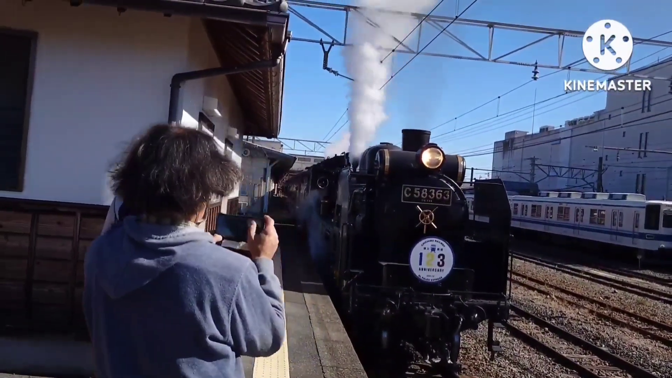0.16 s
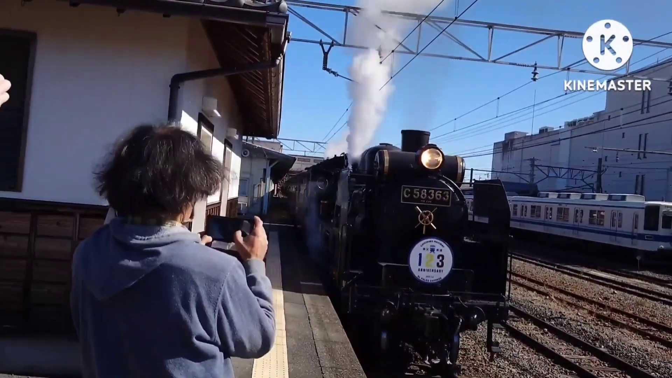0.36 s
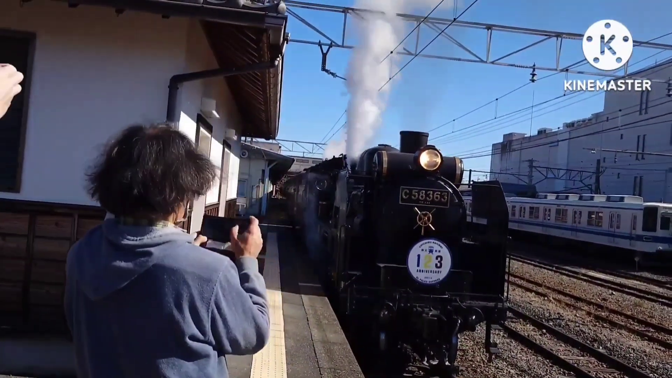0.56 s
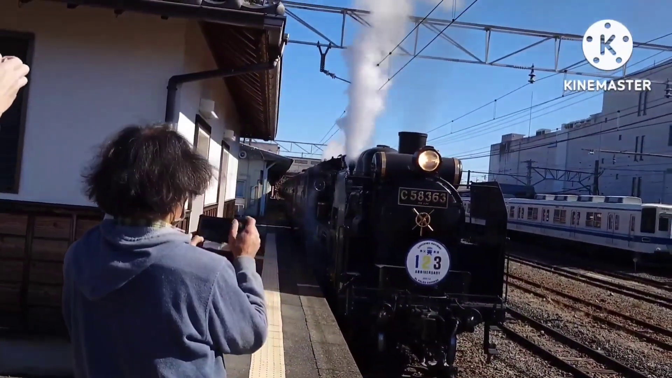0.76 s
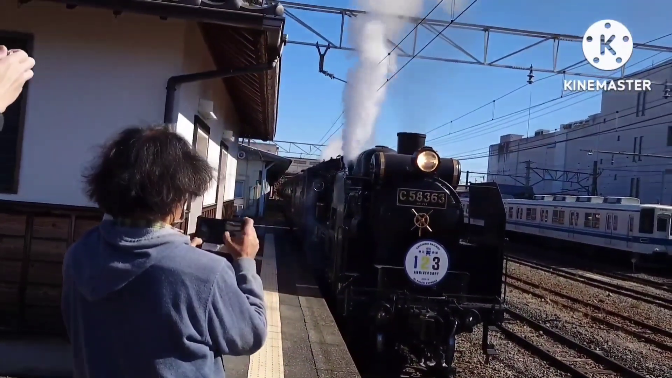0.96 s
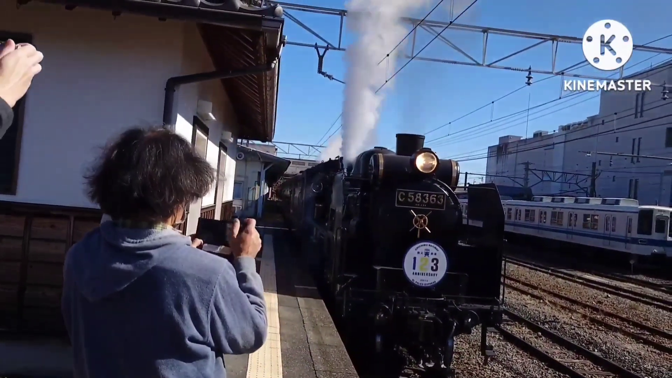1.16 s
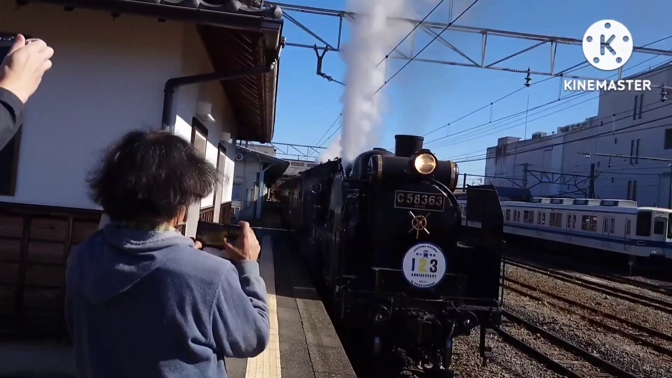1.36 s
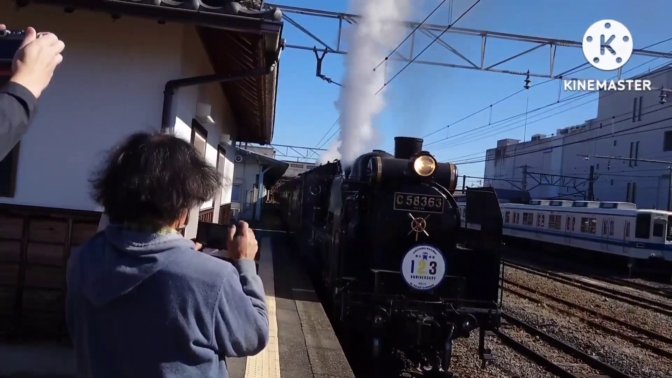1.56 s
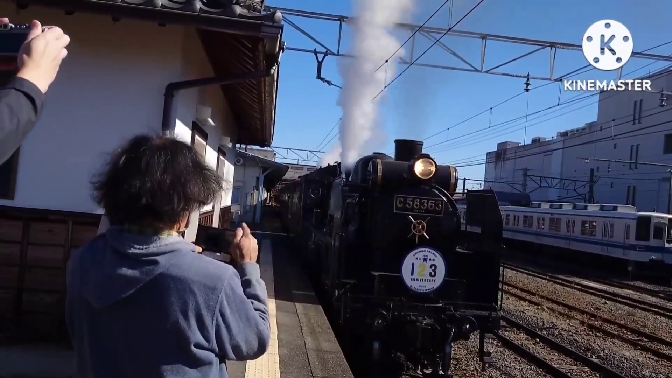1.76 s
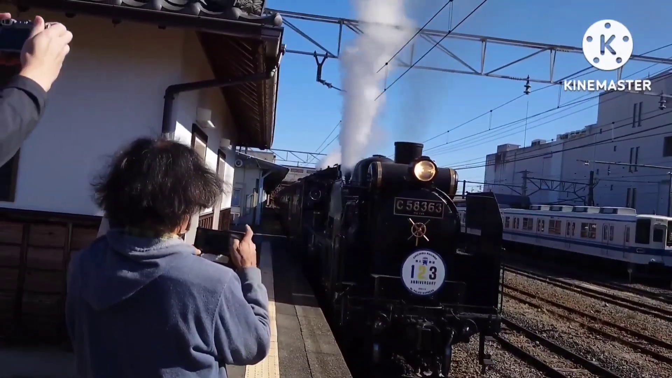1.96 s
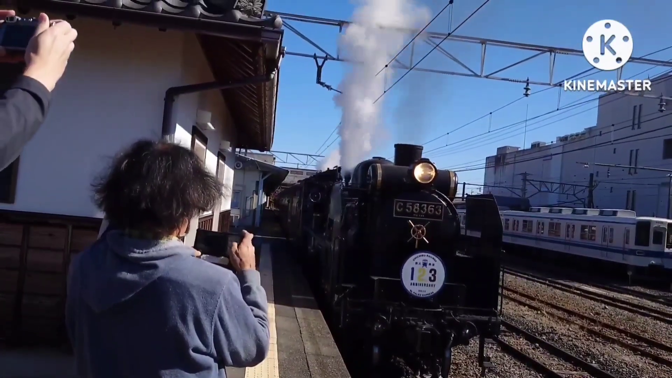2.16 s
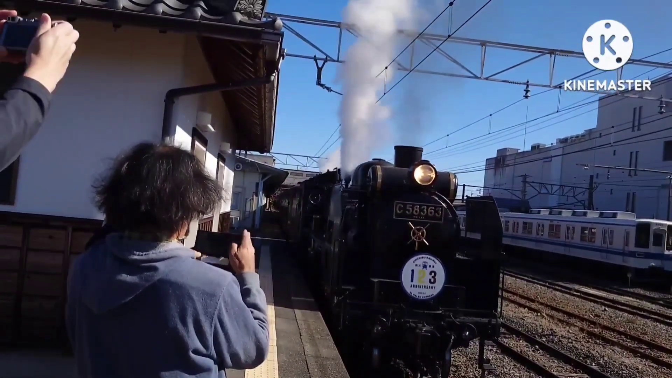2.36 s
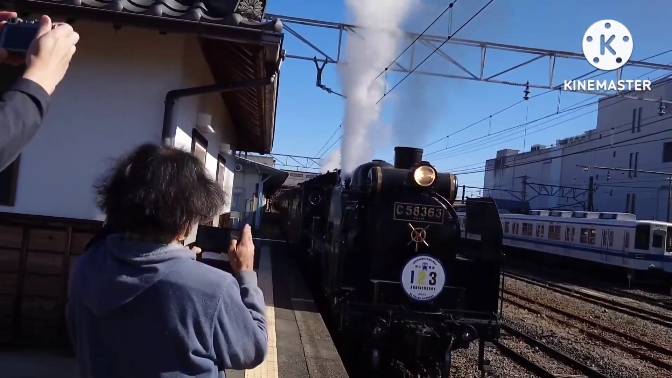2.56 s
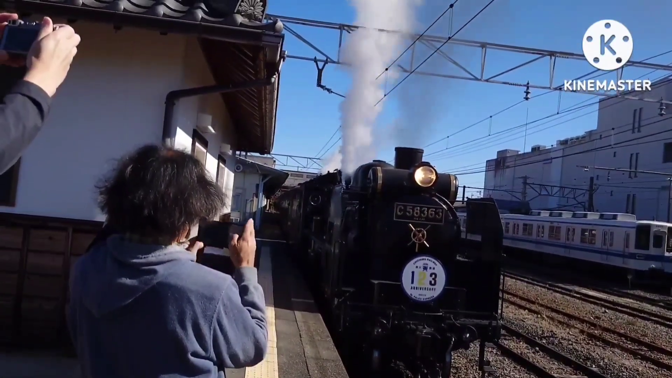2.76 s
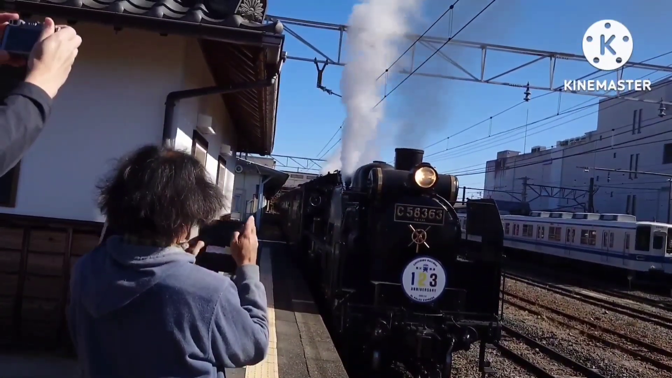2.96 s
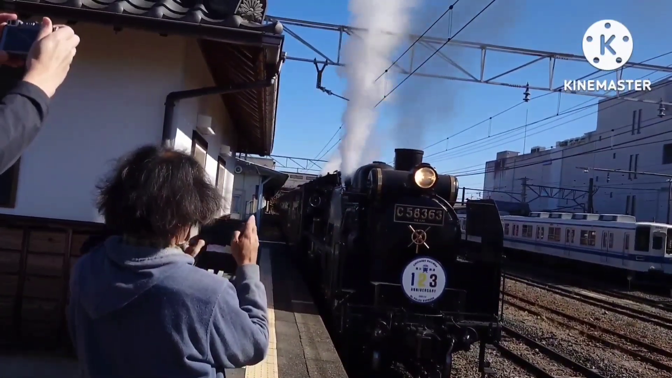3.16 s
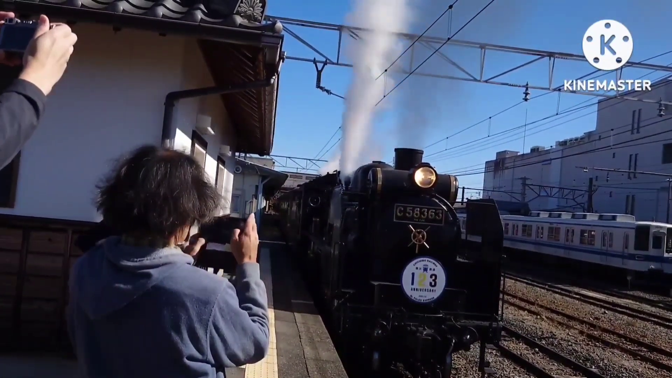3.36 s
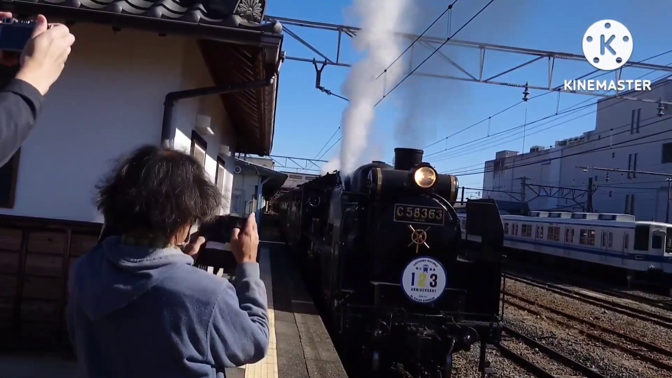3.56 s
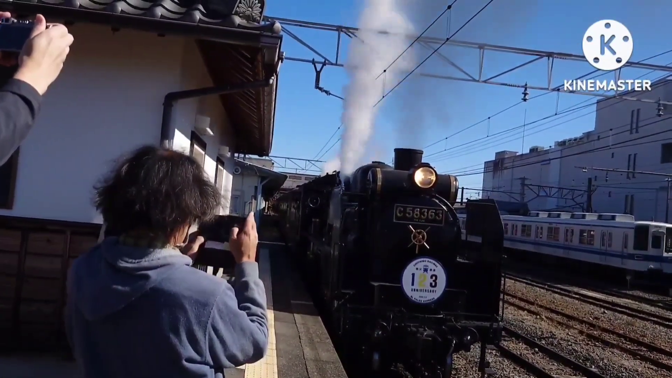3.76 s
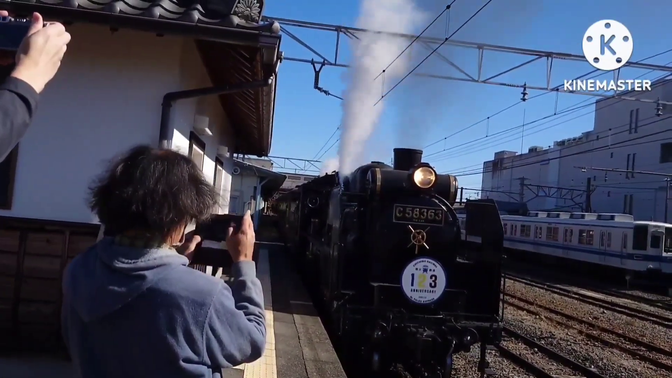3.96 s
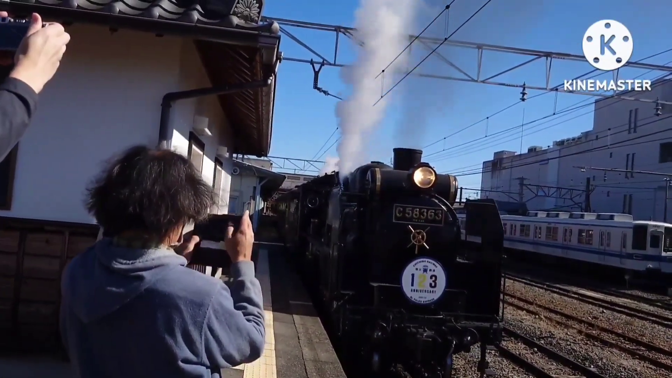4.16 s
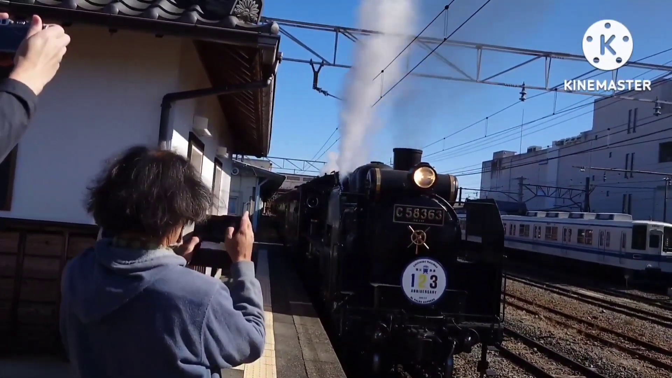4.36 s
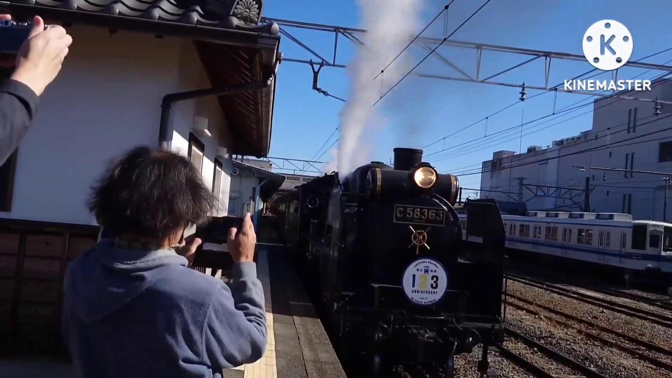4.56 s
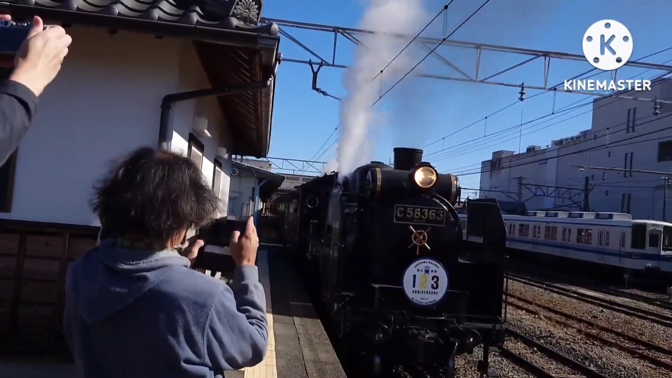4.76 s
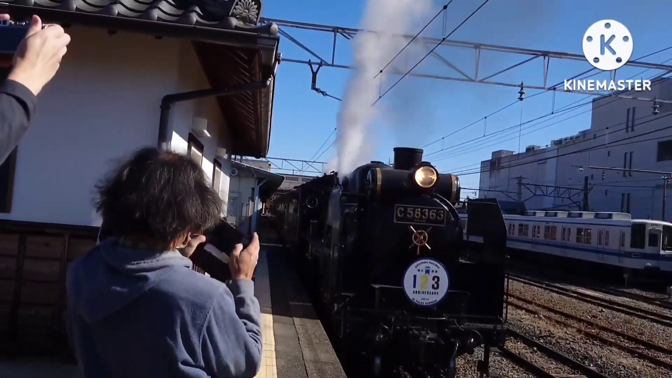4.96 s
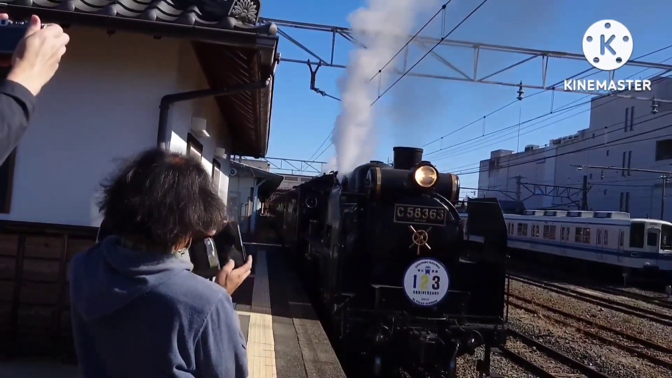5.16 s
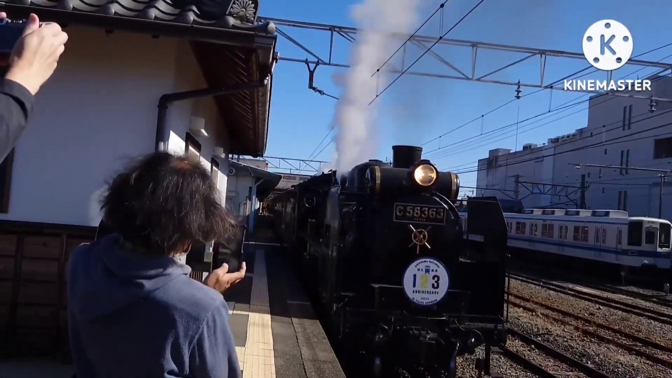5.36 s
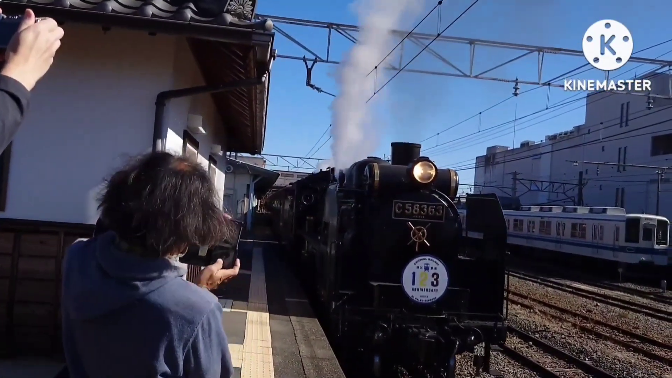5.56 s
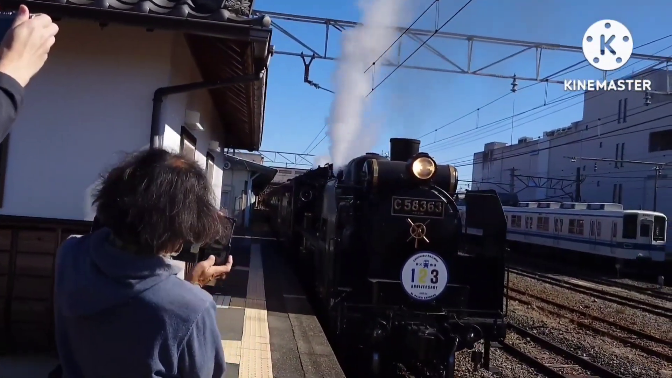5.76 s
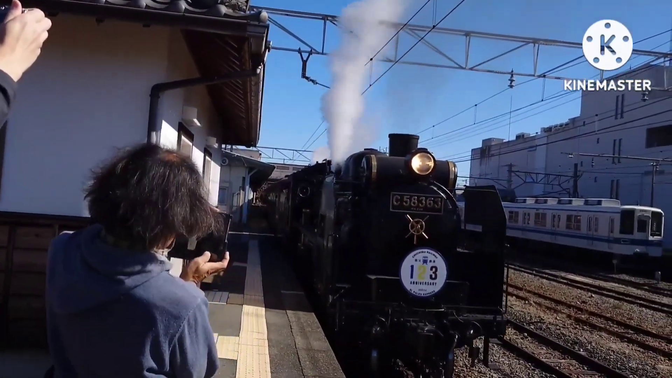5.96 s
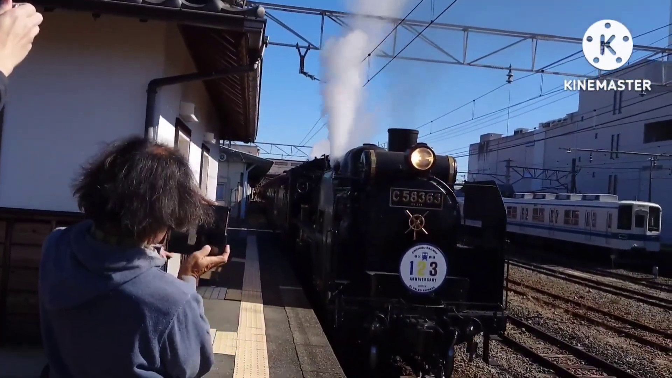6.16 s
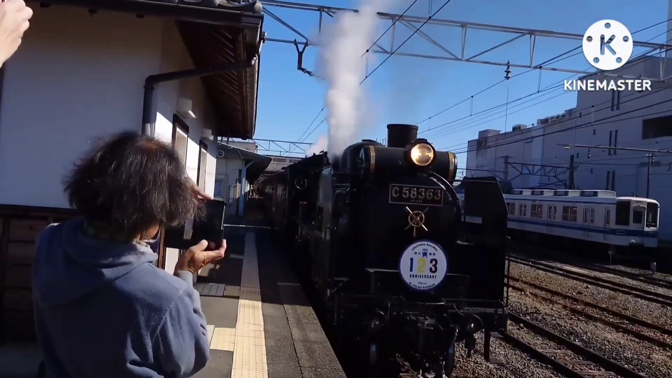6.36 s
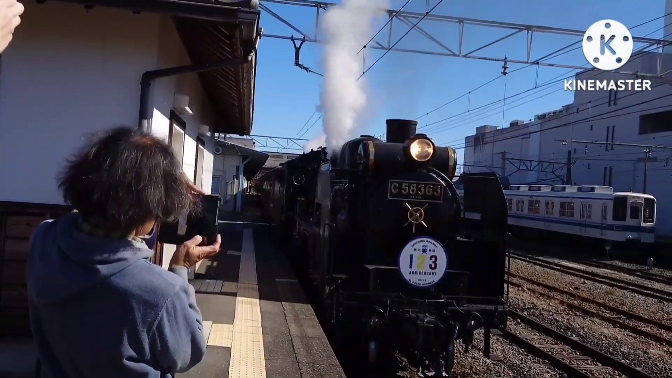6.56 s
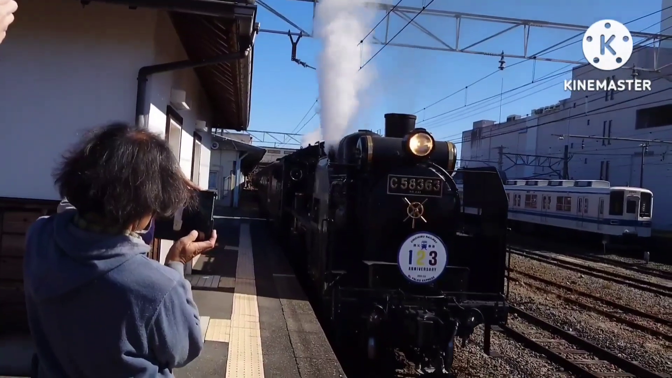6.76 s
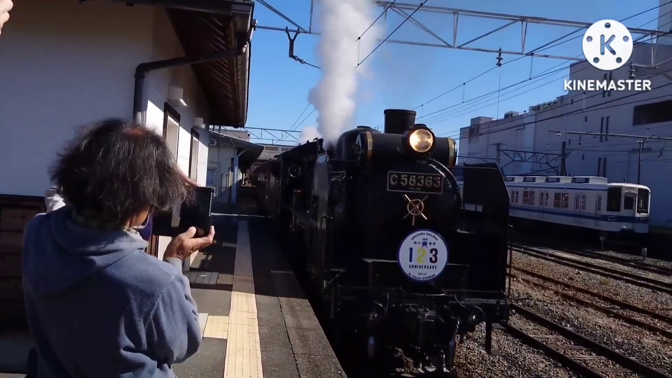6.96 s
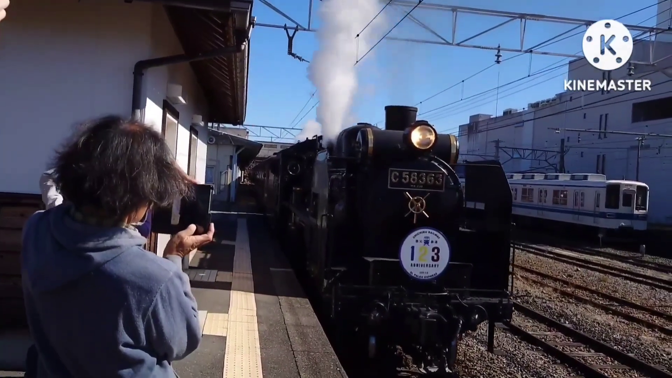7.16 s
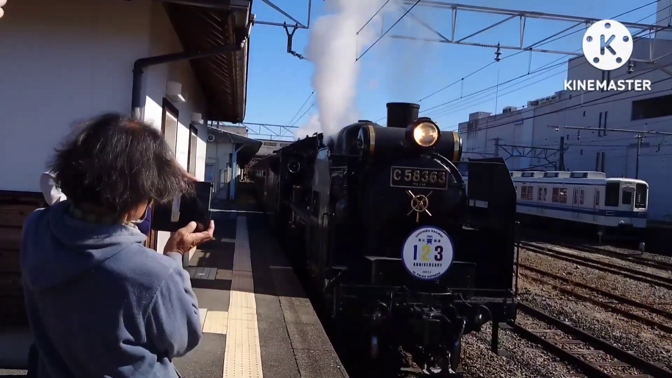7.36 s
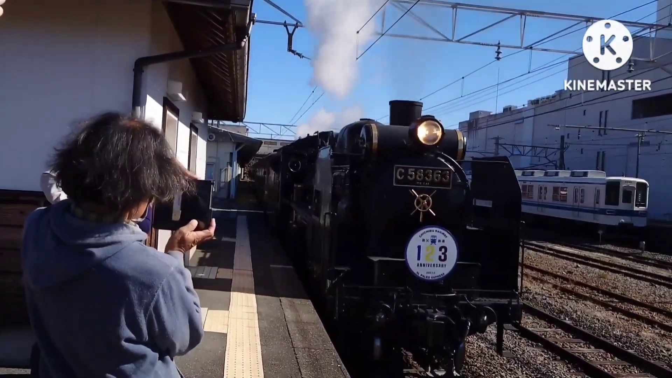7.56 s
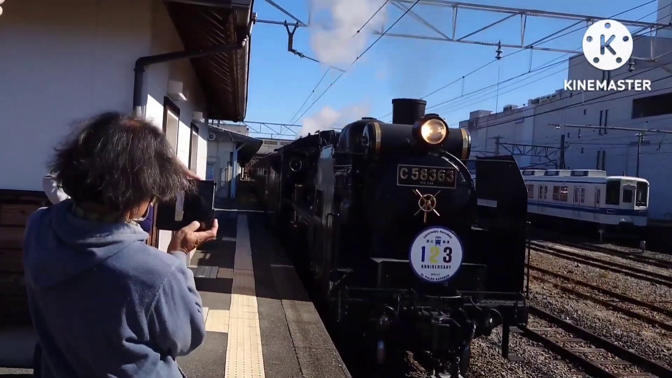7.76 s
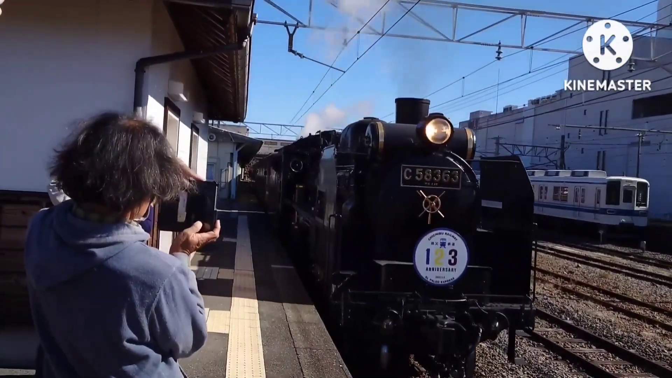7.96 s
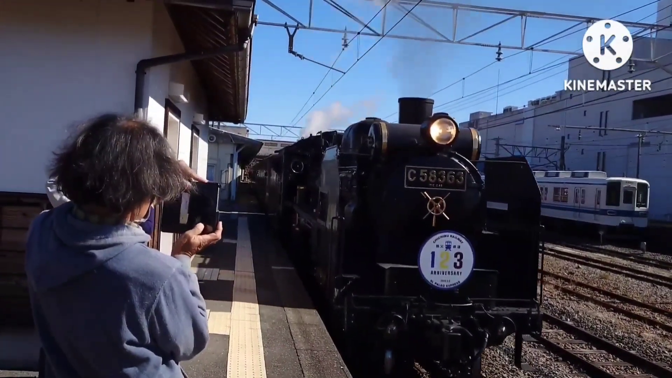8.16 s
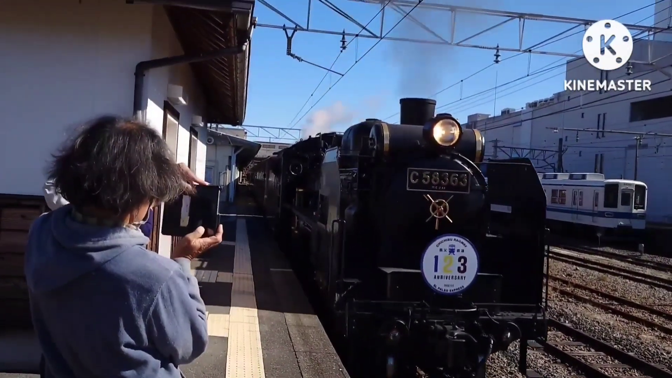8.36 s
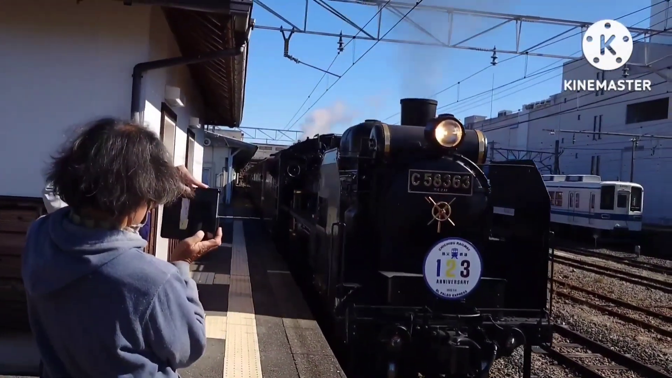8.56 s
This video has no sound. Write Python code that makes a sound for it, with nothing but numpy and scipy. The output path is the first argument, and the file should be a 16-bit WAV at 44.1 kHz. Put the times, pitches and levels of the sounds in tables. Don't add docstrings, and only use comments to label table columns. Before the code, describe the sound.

One sustained steam whistle blast fills nearly the whole sound, middle-pitched, dense and beating, with rough rushing steam around it. A brief water sputter breaks it midway, and the pitch dips slightly before the valve closes. The chord then lingers and fades off distant walls over soft leaking steam, with gusts bumping the handheld microphone. Near, loud, outdoors, with short platform reflections.

```python
import sys
import numpy as np
from scipy import signal
from scipy.fft import rfft, irfft, next_fast_len
from scipy.io import wavfile
from scipy.ndimage import uniform_filter1d

SR = 44100
rng = np.random.default_rng(int(sys.argv[2]) if len(sys.argv) > 2 else 0)


def to_wav(s):
    ch = np.atleast_2d(s).T
    pcm = np.round(np.clip(ch, -1, 1) * 32767)
    wavfile.write(sys.argv[1], SR, pcm.astype(np.int16))


def gain_from_db(level_db):
    decades = np.asarray(level_db, float) / 20
    return 10 ** decades


N = 379701

SHUT_S = 7.66
EASE_S, EASE_LENGTH_S = 6.45, 0.249
LEFT_RIGHT = np.array([[1], [-1]])


def clock():
    return np.arange(N) / SR


def ramp(start_s, length_s):
    return np.clip((clock() - start_s) / length_s, 0, 1)


def bump(s, half_s):
    return np.exp(-((clock() - s) / half_s) ** 2)


def rms_one(x):
    return x / np.sqrt(np.mean(np.abs(x) ** 2) + 1e-20)


def in_time(rows):
    s, *columns = np.transpose(rows)
    return [np.interp(clock(), s, column) for column in columns]


def at_hz(points, hz):
    point_hz, level_db = np.transpose(points)
    return np.interp(np.log(hz), np.log(np.maximum(point_hz, 1)), level_db)


def drift(rate_hz):
    r = np.exp(-80 * np.pi * rate_hz / SR)
    noise = rng.standard_normal(N // 40 + 2002)
    slow = signal.lfilter([1], [1, -2 * r, r * r], noise)[2000:]
    return np.interp(np.arange(N) / 40, np.arange(len(slow)), rms_one(slow))


def two_ports(tone, pan_db, lead):
    left = gain_from_db(pan_db / 2) * np.real(tone * np.exp(1j * lead))
    right = gain_from_db(-pan_db / 2) * np.real(tone)
    return np.array([left, right])


def pitch(warm_hz, flat_hz, warm_up_s, sag_hz):
    climb = flat_hz * np.exp(-clock() / warm_up_s)
    return warm_hz - climb - sag_hz * ramp(EASE_S, EASE_LENGTH_S)


def chamber(hz, level_db, wobble_hz, rough, order=1):
    turn = 2 * np.pi * np.cumsum(hz + wobble_hz) / SR
    shake = 1 + rough * (drift(13.4) + 1j * drift(18.4))
    steady_power = np.sqrt(2 / (1 + 2 * rough ** 2))
    return steady_power * gain_from_db(level_db) * shake * np.exp(1j * order * turn)


# (time [s], depth [dB], half length [s])
SPUTTERS = [
    (4.27, 12, .011),
    (4.312, 5, .01),
    (4.392, 28, .014),
    (4.464, 18, .011),
    (4.513, 8, .01),
    (4.557, 6, .01),
    (7.25, 3, .05),
]


def choke_db(stretch=1):
    return sum(db * bump(s, stretch * half_s) for s, db, half_s in SPUTTERS)


# (time [s], tone level [dB], left-right [dB])
FIRST_LEVEL = [(0, -29.5, 2), (.4, -38, -9), (.9, -42.5, -19), (1.15, -37, -13.5), (2.6, -40, -17),
               (3.8, -31.5, 0.5), (4.3, -30.5, 2), (4.39, -28, 4), (4.72, -30.5, 4), (4.95, -26.5, 2),
               (5.8, -25, 1), (6.5, -24.5, -3.5), (6.7, -27, -4), (7.66, -28, 0)]


def first_chamber(hz):
    level_db, pan_db = in_time(FIRST_LEVEL)
    wobble = 0.88 * drift(9.4)
    out = two_ports(chamber(hz, level_db, wobble, rough=0.086), pan_db, lead=0.26)
    out += two_ports(chamber(hz, -44, wobble, rough=0.25, order=3), 1.2, lead=0.4)
    return out


# (time [s], tone level [dB], left-right [dB])
SECOND_LEVEL = [(0, -23, 1), (1.0, -25.5, -2), (1.93, -26.5, -6), (2.0, -35.5, 8), (3.05, -38, 18.5),
                (4.0, -37.5, 20), (5.2, -27, -1), (6.3, -25, 7), (6.7, -30.5, -6), (7.0, -24, -5),
                (7.66, -23.5, -2)]
# (harmonic number, time [s], level before and when eased [dB], level after [dB])
OVERTONES = [
    (2, 0.5, -44, -35.5),
    (3, .7, -38.5, -37),
    (4, .02, -39.5, -35.5),
]


def second_chamber(hz):
    level_db, pan_db = in_time(SECOND_LEVEL)
    open_wide = 1 - ramp(EASE_S, EASE_LENGTH_S)
    second_db, third_db, fourth_db = (easy + (hard - easy) * ramp(s, 0.04) * open_wide
                                      for _, s, easy, hard in OVERTONES)
    wobble = 1.025 * drift(10.1)
    out = two_ports(chamber(hz, level_db, wobble, rough=0.19), pan_db, lead=0.44)
    out += two_ports(chamber(hz, second_db, wobble, rough=0.19, order=2), 3.3, lead=0.98)
    out += two_ports(chamber(hz, third_db, wobble, rough=0.22, order=3), 11.8, lead=0.47)
    out += two_ports(chamber(hz, fourth_db, wobble, rough=0.52, order=4), -8.0, lead=0.18)
    out += two_ports(chamber(hz, fourth_db - 11.0, wobble, rough=0.13, order=5), -1.5, lead=0.4)
    out += two_ports(chamber(hz, -45, wobble, rough=0.35, order=2.66), 0.3, lead=0.3)
    return out


def third_chamber(hz):
    speaking_db = -7 * (1 - ramp(0, 0.3))
    surge_db = 2.3 * bump(4.42, 0.18)
    return chamber(hz, -14 + speaking_db + surge_db - choke_db(), 2.0 * drift(9.0), rough=0.026)


# (time [s], tone level [dB])
FOURTH_LEVEL = [(0, -18.5), (.5, -26), (.75, -20.5), (1.5, -23.5), (2.0, -27.5), (2.4, -21.5), (3.3, -24),
                (3.8, -26.5), (4.4, -25.5), (5.4, -22), (6.45, -25.5), (6.7, -19), (7.0, -27.5),
                (7.25, -21), (7.66, -34)]


def fourth_chamber(hz1, hz2, hz3, hz4, loud):
    level_db, = in_time(FOURTH_LEVEL)
    wobble = 1.57 * drift(9.2)
    near = chamber(hz4, level_db - choke_db() / 2 - 1.5, wobble, rough=0.38)
    mirrored = gain_from_db(-10.5) * np.conj(near) * (loud / np.abs(loud)) ** 2
    out = two_ports(near, 0.6, lead=0.7)
    out += two_ports(mirrored, 0.2, lead=0.3)
    out += two_ports(chamber(hz2 + hz3, -50.5, wobble, rough=0.3), 0.2, lead=0.7)
    out += two_ports(chamber(hz1 + hz2, -52, wobble, rough=1.0), 0.2, lead=0.6)
    return out


# (time [s], tone level [dB], unsteadiness [0-1])
FIFTH_LEVEL = [(0, -17, 0.83), (.35, -26.5, 1.02), (1.3, -25.5, 0.88), (2.75, -31, 1.03), (2.87, -25, 0.3),
               (3.3, -27, .6), (3.6, -23, 0.36), (4.05, -23, .2), (4.17, -36, 0.5), (4.45, -24, .3),
               (5.9, -24.5, 0.33), (6.2, -23, 0.28), (6.8, -25, 0.27), (7.25, -20, 0.31),
               (7.6, -19.5, 0.25)]


def fifth_chamber(hz1, hz5):
    level_db, unsteady = in_time(FIFTH_LEVEL)
    wobble = 5.1 * unsteady * drift(18.6)
    out = two_ports(chamber(hz5, level_db, wobble, rough=np.clip(unsteady, 0, 2)), -1.1, lead=0.62)
    out += two_ports(chamber(hz5, level_db - 18, wobble, rough=0.61, order=2), 1.5, lead=0.15)
    out += two_ports(chamber(hz1 + hz5, -48.5, 0.35 * wobble, rough=0.66), 1.5, lead=0.3)
    return out


# (time [s], pitch [Hz])
THIRD_PITCH = [(0, 524), (.21, 536), (1.13, 540), (1.47, 547), (1.85, 544), (2.45, 554), (2.8, 548),
               (3.9, 544), (4.4, 561), (4.62, 551), (5.35, 549.5), (6.0, 550.5), (6.4, 556), (6.72, 535),
               (7.04, 548), (7.27, 539), (7.5, 543), (7.66, 541)]


def chimes():
    hz1 = pitch(warm_hz=366, flat_hz=20, warm_up_s=2.2, sag_hz=2.53)
    hz2 = pitch(warm_hz=449.5, flat_hz=15, warm_up_s=2.0, sag_hz=6.0)
    hz3, = in_time(THIRD_PITCH)
    hz4 = pitch(warm_hz=590, flat_hz=17, warm_up_s=3.2, sag_hz=8.5)
    hz5 = pitch(warm_hz=722, flat_hz=43, warm_up_s=4.5, sag_hz=0.43)
    loud = third_chamber(hz3)
    out = first_chamber(hz1) + second_chamber(hz2) + two_ports(loud, 0.2, lead=0.3)
    return out + fourth_chamber(hz1, hz2, hz3, hz4, loud) + fifth_chamber(hz1, hz5)


# (frequency [Hz], width [Hz], level [dB], left-right [dB])
BREATH = [(527, 38, -4.5, 2.5), (632, 98, 0, -1), (736, 146, -10.5, -7), (424, 200, -15.5, 6),
          (1114, 230, -32, -4), (1312, 210, -10.5, -13.5), (1698, 235, -2, -1.5), (2126, 150, -15, 5),
          (3205, 450, -15, 15), (4515, 290, -6.5, 3), (5010, 250, -0.5, -5), (5550, 410, -6.5, -3),
          (8250, 1650, -7, 5.5)]


def breath():
    groups = np.zeros((2, 2, N))
    for hz, width_hz, level_db, pan_db in BREATH:
        r = np.exp(-np.pi * width_hz / SR)
        w = 2 * np.pi * hz / SR
        stage = [(1 - r * r) / 2, 0, (r * r - 1) / 2, 1, -2 * r * np.cos(w), r * r]
        mid, side = signal.sosfilt([stage, stage], rng.standard_normal((2, N)))
        pair = (mid + 0.12 * side * LEFT_RIGHT) * gain_from_db(pan_db / 2 * LEFT_RIGHT)
        groups[int(hz > 900)] += gain_from_db(level_db + 1.3 * drift(2.0)) * pair
    return rms_one(groups[0]), rms_one(groups[1])


# (frequency [Hz], level [dB per Hz])
JET_COLOUR = [(530, -43), (900, -9.5), (1360, -7), (1520, -15), (1730, -4.5), (1970, -15.5), (2170, -8),
              (2500, -11), (2990, -4.5), (4980, -10), (15400, -9)]
# (frequency [Hz], left-right [dB])
JET_SIDE = [(60, -0.5), (110, 0.0), (200, 6), (380, 4), (700, 8), (1290, 2.5), (2380, 1.5), (4400, -1),
            (8120, -0.5), (15000, 2.5)]


def hiss():
    alike = 0.14
    out, together = 0, drift(3.0)
    edges = np.geomspace(200, 16500, 17)
    white = rng.standard_normal((2, 2, N))
    for k, (low, high) in enumerate(zip(edges, edges[1:])):
        band = signal.butter(2, [low, high], "band", fs=SR, output="sos")
        mid, side = signal.sosfilt(band, white[k % 2])
        hz = np.sqrt(low * high)
        flicker_db = 0.92 * (0.62 * together + drift(5.0))
        gain = gain_from_db(at_hz(JET_COLOUR, hz) + flicker_db)
        pan = gain_from_db(at_hz(JET_SIDE, hz) / 2 * LEFT_RIGHT)
        out = out + gain * pan * (np.sqrt(1 + alike) * mid + np.sqrt(1 - alike) * side * LEFT_RIGHT)
    return rms_one(out)


# (left delay [ms], right delay [ms], level [dB])
NEAR = [
    (1.9, 2.6, -6),
    (4.3, 3.5, -6.5),
    (7.1, 8.2, -9),
]
# (frequency [Hz], width [Hz], depth [0-1])
HOLLOWS = [
    (983, 185, 1),
    (1985, 63, 1),
    (2574, 184, 0.42),
]


def platform(x):
    out, now = x.copy(), np.arange(N)
    for left_ms, right_ms, level_db in NEAR:
        sway_ms = 0.09 * drift(0.6)
        for side, ms in enumerate((left_ms, right_ms)):
            delay = (ms + sway_ms) * SR / 1000
            out[side] += gain_from_db(level_db) * np.interp(now - delay, now, x[side])
    out *= np.std(x) / np.std(out)
    for hz, width_hz, depth in HOLLOWS:
        peak = signal.iirpeak(hz, hz / width_hz, fs=SR)
        out = out - np.clip(depth, 0, 1) * signal.lfilter(*peak, out)
    return out


# (time [s], shift [percent], level [dB])
PLUME = [
    (0, -.5, 3),
    (1.5, 0.06, -1.5),
    (2.6, -2, 0),
    (3.1, 0.76, 1),
    (3.9, 0.18, -2),
    (4.5, -.5, -0.5),
    (5.3, 1, 0.5),
    (6.3, 2.5, 3),
    (7.0, .5, -2),
    (7.66, -1.05, -4),
]


def leaning(x):
    share = in_time(PLUME)[0] / 100
    place = np.cumsum(1 + share - share.mean())
    return np.array([np.interp(place, np.arange(N), side) for side in x])


# (time [s], hiss level [dB])
JET = [(0.0, -24), (0.17, -22), (0.23, -23), (0.59, -21.5), (1.91, -23.5), (2.14, -26), (2.55, -21),
       (2.72, -26.5), (3.18, -26.5), (3.33, -24), (3.69, -26.5), (4.29, -23.5), (4.48, -20), (5.09, -23),
       (6.28, -22.5), (7.15, -22), (7.32, -20), (7.62, -20)]


def steam():
    flow_db, = in_time(JET)
    hiss_db = flow_db + 1.5
    spit_db = 0.18 * choke_db(stretch=2)
    breath_db = -27.5 + 0.49 * (flow_db - flow_db.mean()) + spit_db
    mouth_db = -4 + in_time(PLUME)[1] + spit_db / 2
    low, high = breath()
    mouths = gain_from_db(hiss_db + mouth_db) * leaning(high)
    return gain_from_db(breath_db) * low, platform(mouths + gain_from_db(hiss_db) * hiss())


def lingering(level_db, t60):
    return level_db - 60 * np.maximum(clock() - SHUT_S, 0) / t60


# (frequency [Hz], level at the shut [dB], 60 dB decay [s], lift by far walls [dB])
YARD = [
    (357.5, -37.5, 6.4, 5),
    (443, -33.5, 3.3, 2),
    (543, -23.5, 2.15, 2.5),
    (580, -34, 3.2, 7),
    (715, -30.5, 2.7, 16),
    (900, -41, 1.7, 4),
]
# (time [s], strength [0-1])
WALLS = [
    (7.73, 0.98),
    (7.97, 0.36),
    (8.28, 0.5),
    (8.45, 0.6),
]


def far_tones():
    out = np.zeros((2, N))
    walls = sum(share * bump(s, 0.032) for s, share in WALLS)
    for hz, level_db, t60, lift_db in YARD:
        shared_db = lingering(level_db, t60) + lift_db * walls
        shared = chamber(hz, shared_db, 0.77 * drift(6.1), rough=0.22)
        out += np.real([shared * (1 + 0.4 * (drift(4.0) + 1j * drift(4.0))) for side in range(2)])
    return out


def buildings(x, t60):
    age = np.arange(int(t60 * SR)) / SR
    scatter = rng.standard_normal((2, int(1.5 * SR)))[:, :len(age)]
    response = scatter * gain_from_db(-60 * age / t60)
    return rms_one(signal.fftconvolve(x[None], response, axes=1)[:, :N])


def echoes(tones, low, jet, valve):
    duck_db = -8 * valve
    swell = ramp(SHUT_S, 0.086)
    low_db = lingering(-32.5, t60=2.44) + 9.1 * swell + duck_db
    last_wall_db = -4 * ramp(8.06, 0.04)
    high_db = lingering(-33.5, t60=2.5) + 8.3 * swell + duck_db + last_wall_db
    band = signal.butter(4, [1150, 2100], "band", fs=SR, output="sos")
    dull = signal.sosfilt(band, (0.9 * tones + jet)[0])
    return gain_from_db(low_db) * buildings(low[0], t60=0.6) + gain_from_db(high_db) * buildings(dull, t60=0.97)


# (frequency [Hz], level [dB per Hz])
LEAK = [(120, -22), (300, -5), (550, -6), (1000, 2), (1700, 3.5), (2100, -2.5), (2700, 0.5), (5000, -0.5),
        (8000, -1), (12000, -2), (15400, -3.5)]


def leak():
    size = next_fast_len(N)
    hz = np.maximum(np.arange(size // 2 + 1) * SR / size, 1)
    air = rng.standard_normal((2, size)) + 0.25 * rng.standard_normal(size)
    gain = gain_from_db(at_hz(LEAK, hz) + at_hz(JET_SIDE, hz) / 2 * LEFT_RIGHT)
    noise = irfft(rfft(air) * gain, size)[:, :N]
    return gain_from_db(-31 + 0.6 * drift(4.0)) * rms_one(noise)


# (time [s], rise [s], fall [s], level over the breeze [dB])
GUSTS = [
    (7.15, .04, .55, 17),
    (8.2, .04, .08, 7),
    (8.47, .14, .2, 13),
    (4.1, .3, .6, 3),
]
# (time [s], half length [s], level [dB])
BOOMS = [
    (7.31, .06, 19),
    (7.77, .07, 17),
    (7.95, .08, 17),
    (8.25, .2, 12),
]


def wind():
    rumble_db = -50.5 + sum(db * ramp(s, rise) * (1 - ramp(s + rise, fall)) for s, rise, fall, db in GUSTS)
    boom_db = -17 + sum(db * bump(s, half_s) for s, half_s, db in BOOMS)
    shared, own = rng.standard_normal(N), rng.standard_normal((2, N))
    rumble_band = signal.butter(3, [12, 80], "band", fs=SR, output="sos")
    boom_band = signal.butter(2, [160, 198], "band", fs=SR, output="sos")
    rumble = rms_one(signal.sosfilt(rumble_band, shared + 0.45 * own))
    boom = rms_one(signal.sosfilt(boom_band, shared + 0.25 * own))
    boom = gain_from_db(boom_db + 2.7 * drift(11.0)) * boom
    return gain_from_db(rumble_db + 2.7 * drift(5.7)) * (rumble + boom)


def scene():
    valve = np.clip((SHUT_S - clock()) / 0.036, 0, 1)
    tones = chimes()
    low, jet = steam()
    blast = valve * (tones + low + jet)
    answer = (1 - valve) * far_tones() + echoes(tones, low, jet, valve)
    return blast + answer + leak() + wind()


def roll_off(x):
    return signal.sosfilt(signal.butter(12, 15510, fs=SR, output="sos"), x)


def record(dry):
    body = signal.sosfilt(signal.butter(2, 900, fs=SR, output="sos"), dry)
    bent = dry + 0.05 * (body ** 2 - uniform_filter1d(body ** 2, size=1024))
    rounded = 1.623 * np.tanh(bent / 1.58)
    cut = signal.sosfilt(signal.cheby2(12, 70, 16800, fs=SR, output="sos"), rounded)
    return roll_off(cut)


dry = scene()
out = record(dry)
to_wav(out)
```